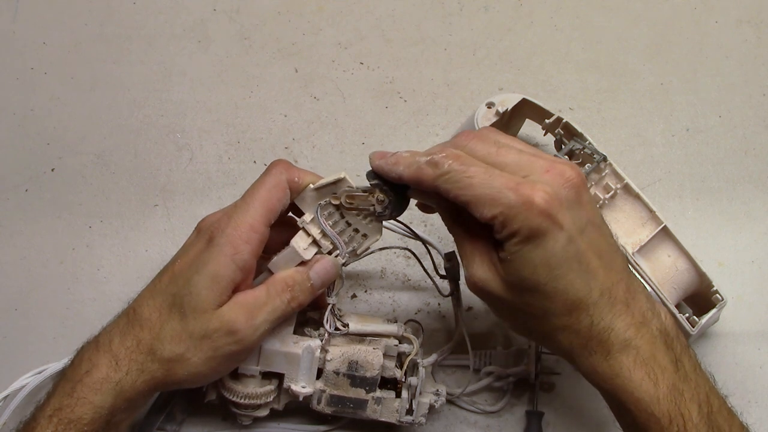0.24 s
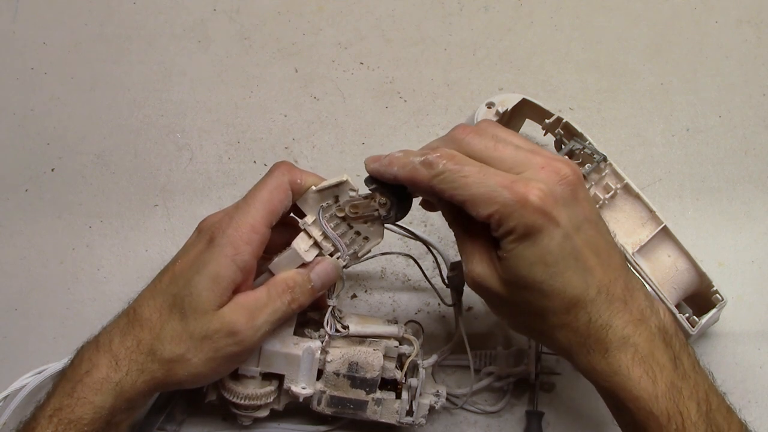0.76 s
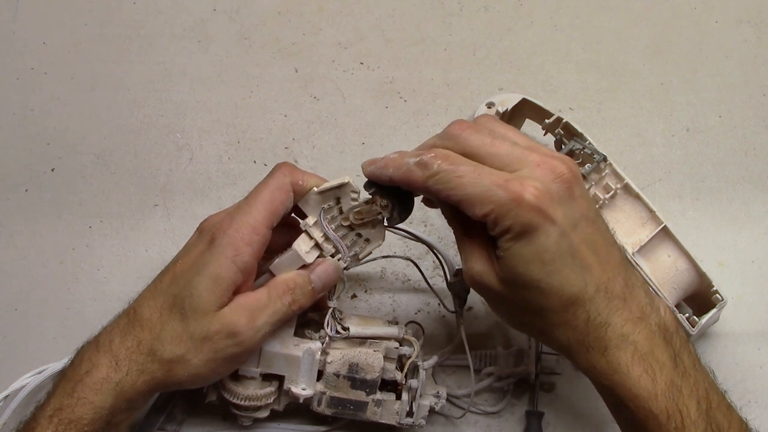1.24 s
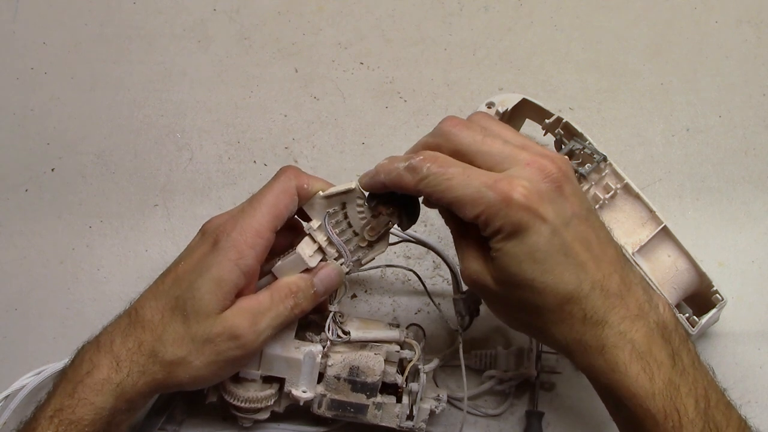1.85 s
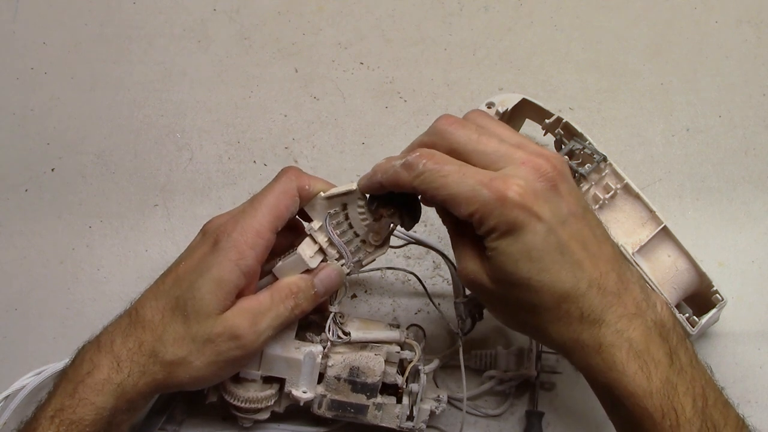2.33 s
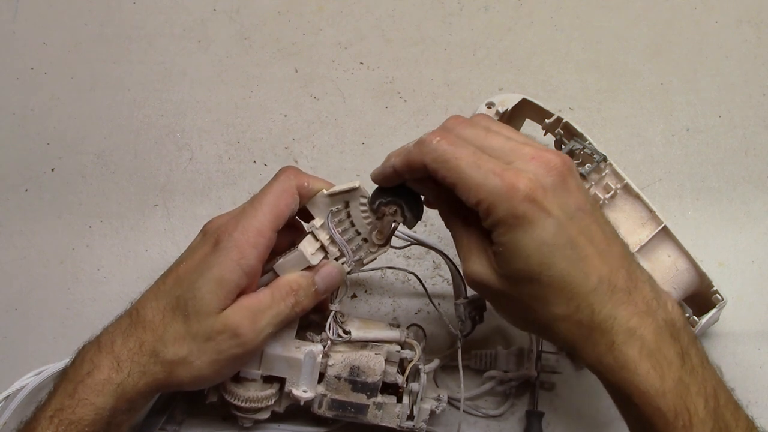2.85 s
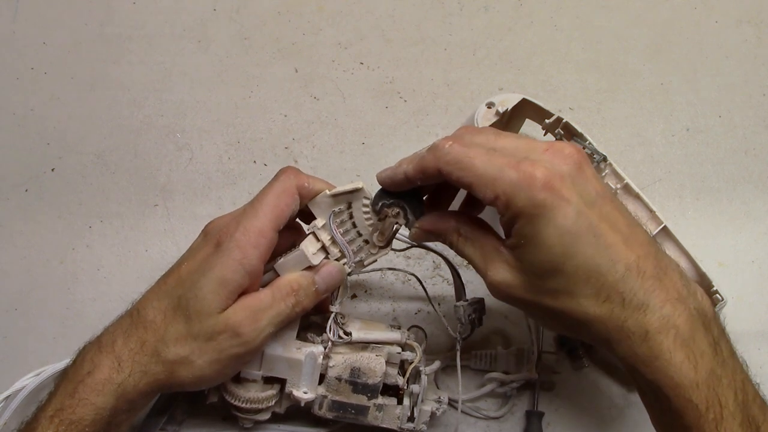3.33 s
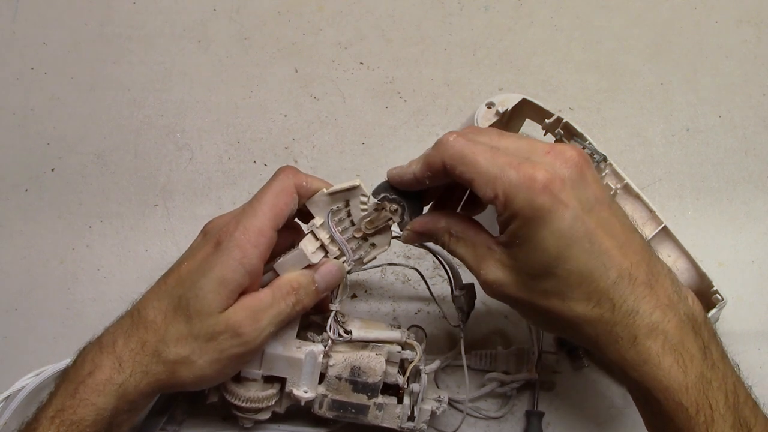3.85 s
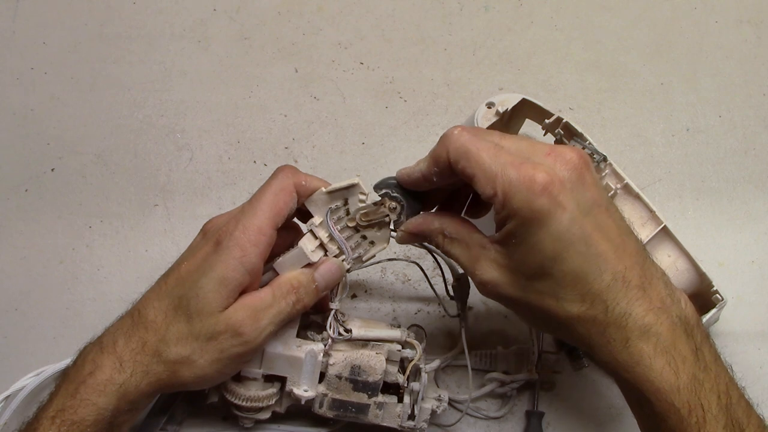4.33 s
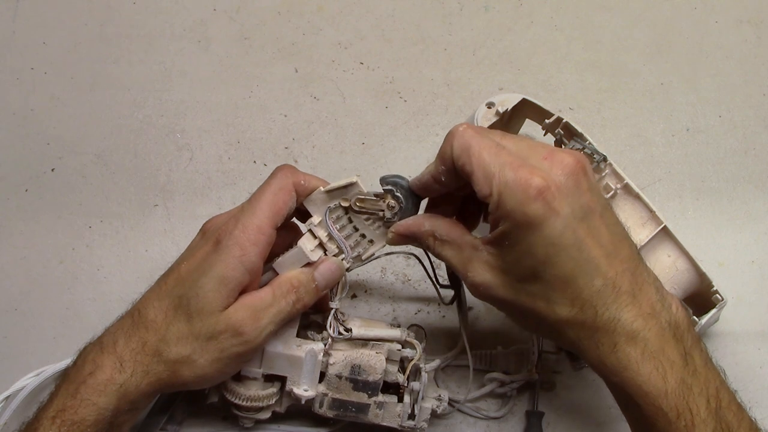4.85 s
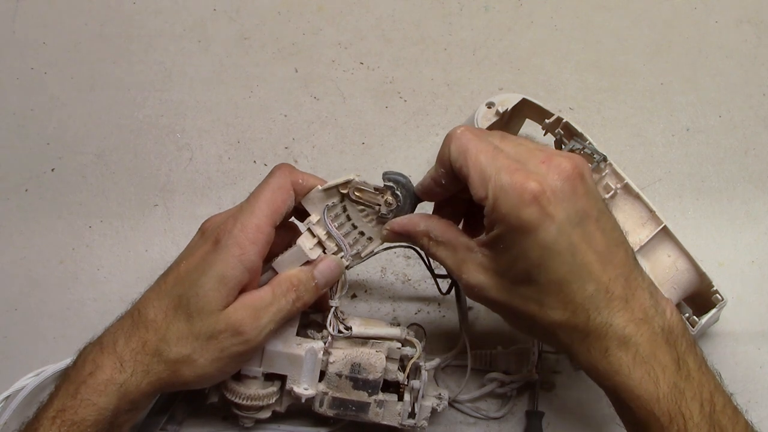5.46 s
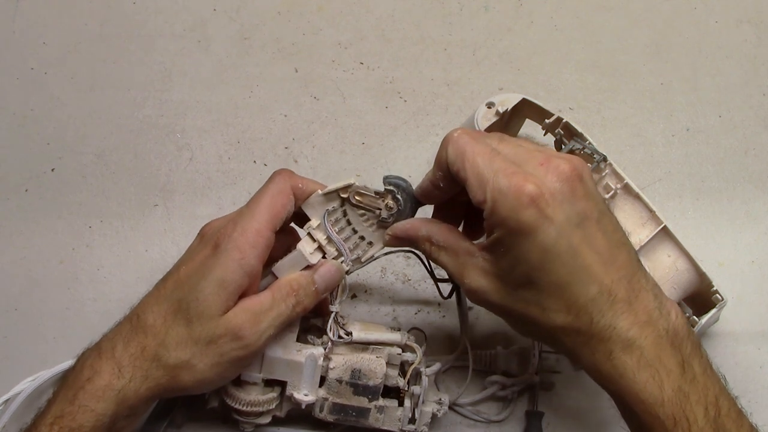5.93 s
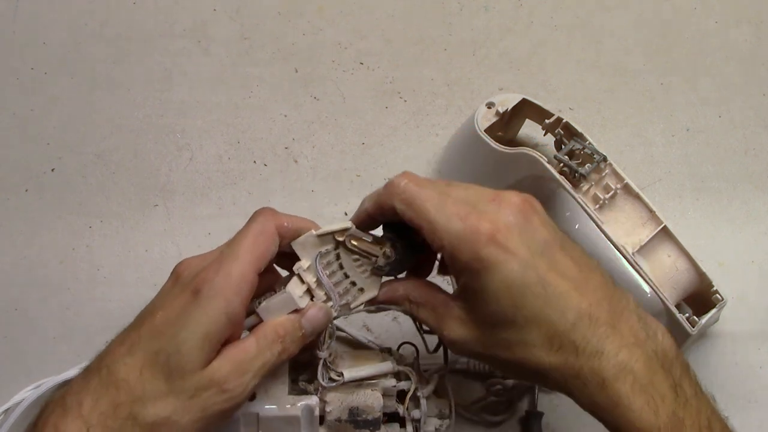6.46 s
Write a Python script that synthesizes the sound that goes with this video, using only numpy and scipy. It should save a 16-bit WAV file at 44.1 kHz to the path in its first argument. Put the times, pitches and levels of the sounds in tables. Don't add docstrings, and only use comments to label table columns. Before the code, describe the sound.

A small plastic rotary switch is turned by hand through crisp, uneven detent clicks, then parts clatter down on a table in a quiet room.

```python
import sys
import numpy as np
from scipy import signal
from scipy.io import wavfile
from scipy.ndimage import uniform_filter1d

SR = 44100
rng = np.random.default_rng(int(sys.argv[2]) if len(sys.argv) > 2 else 0)


def log_audio(samples):
    frames = np.atleast_2d(samples).T
    limited = np.clip(frames, -1, 1)
    pcm = np.round(limited * 32767).astype(np.int16)
    wavfile.write(sys.argv[1], SR, pcm)


def volts_from_decibels(level):
    exponent = np.asarray(level, float) / 20
    return 10 ** exponent


N = 294756


def evened(x):
    return x / np.sqrt(np.mean(x ** 2) + 1e-20)


def read(points, hz):
    f, value = np.transpose(points)
    return np.interp(np.log(hz + 1), np.log(f + 1), value)


def add(mix, s, sound):
    part = mix[max(round(s * SR), 0):][:len(sound)]
    part += sound[:len(part)]


def play(source, rows):
    out = np.zeros(N)
    for row in rows:
        add(out, *source(*row))
    return out


def ring(modes, seconds, favour_hz=None, favour_db=0, spread=0.16, loose=0., scatter=0.):
    hz, db, t60 = np.transpose(modes)[:, :, None]
    shift, phase = rng.standard_normal((len(modes), 2)).T[:, :, None]
    if favour_hz:
        db = db + favour_db * np.exp(-(np.log(hz / favour_hz) / spread) ** 2)
    t = np.arange(round(seconds * SR)) / SR
    wave = np.sin(2 * np.pi * hz * (1 + loose * shift) * t + scatter * phase)
    return (volts_from_decibels(db - 60 * t / t60) * wave).sum(0)


def grit(size, per_s, uneven_db):
    hit, sign, strength = rng.random((size, 3)).T
    height = volts_from_decibels(-uneven_db * np.log(strength + 0.0035))
    return (hit < per_s / SR) * np.sign(sign - .5) * height


# frequency in Hz, level in dB per Hz.
AIR_COLOUR = [(20, -30), (45, -19), (75, -5.5), (120, -6), (230, -3), (420, -3.5), (700, -7.5),
              (1130, -11.5), (1520, -10), (2480, -16), (3340, -18), (6050, -22.5), (11000, -28.5),
              (16000, -38.5)]
# frequency in Hz, likeness (1 = same).
AIR_LIKENESS = [(60, 0.93), (180, 0.9), (550, 0.74), (1650, 0.81), (4970, 0.79), (15000, 0.9)]


def air():
    frames, hz = N // 256 + 5, np.fft.rfftfreq(1024, 1 / SR)
    a, b, c, d, patches = rng.standard_normal((frames, 513, 5)).T
    patches = evened(uniform_filter1d(uniform_filter1d(patches, 10, 0), 16, 1))
    same = np.clip(read(AIR_LIKENESS, hz), -1, 1)[:, None]
    left = a + 1j * b
    right = same * left + np.sqrt(1 - same ** 2) * (c + 1j * d)
    z = np.array([left, right]) * volts_from_decibels(read(AIR_COLOUR, hz)[:, None] + 0.67 * patches)
    noise = signal.istft(z, nperseg=1024, noverlap=768)[1][:, :N]
    return volts_from_decibels(-53.5) * evened(noise)


FAN_MULTIPLES = (1, 2, 3, 4, 7, 10, 13, 16, 23, 26, 35, 37, 50, 52, 93, 101, 122, 126, 135, 140)
FAN_LEVELS = (-79, -70.5, -71.5, -60.5, -62, -67, -71, -71, -75.5, -71.5, -71, -79, -80, -71.5, -81, -78.5,
              -82, -78, -81, -82.5)


def fan():
    turn_hz, mains_hz, mains_db = 58.87, 360., -70
    t, out = np.arange(N) / SR, np.zeros((2, N))
    for hz, db in [*zip(turn_hz * np.array(FAN_MULTIPLES), FAN_LEVELS), (mains_hz, mains_db)]:
        slow = evened(uniform_filter1d(rng.standard_normal(N // 400 + 2), 5))
        waver = 1 + 0.29 * np.interp(np.arange(N) / 400, np.arange(len(slow)), slow)
        start, apart = rng.random(2)
        phase = 2 * np.pi * (hz * t + start) + .5 * (apart - .5) * np.array([[-1], [1]])
        out += volts_from_decibels(db) * np.sqrt(2) * waver * np.sin(phase)
    return out


# frequency in Hz, level in dB, t60 in seconds.
SHELL_RINGS = [(1000, -13, .02), (1400, -15, .015), (2350, -1, .012), (2650, -3, .011), (3100, -2, .013),
               (3450, -4, .01), (3900, -8, .01), (4500, -9, .01), (5200, -12, .008), (6000, -11, .008)]
# frequency in Hz, level in dB, t60 in seconds.
SPRING_RINGS = [(6900, -6, .007), (7600, -2, .01), (8500, -1, .01), (9400, -2, .008), (10400, -2, .008),
                (11500, -6, .006), (13000, -14, .005), (14600, -23, .004)]


def switch_body(hz, treble_db):
    shell = evened(ring(SHELL_RINGS, .03, hz, favour_db=6.0, spread=.3, loose=0.018, scatter=1.98))
    position = evened(ring([(hz, 0, .009)], .03))
    spring = evened(ring(SPRING_RINGS, .03, loose=0.044, scatter=2.07))
    position_db = -11.0 - .7 * treble_db
    both = shell + volts_from_decibels(position_db) * position + volts_from_decibels(treble_db - 1.5) * spring
    both = both * (1 - np.exp(-np.arange(len(both)) / SR / .00006))
    return signal.lfilter(*signal.butter(2, 1800, "highpass", fs=SR), both)


def tick(s, db, hz, treble_db, chatter_s=0.00093):
    t = np.arange(500) / SR
    swell = (1 - np.exp(-t / 0.00034)) * np.exp(-t / max(chatter_s, .0002))
    blow = 0.33 * rng.standard_normal(len(t)) * swell
    blow[22] += 1
    sound = np.convolve(blow, switch_body(hz, treble_db))
    loudest = np.sqrt(uniform_filter1d(sound ** 2, size=44).max())
    return s, volts_from_decibels(db - 6.5) * sound / loudest


# start in seconds, peak in dB, main ring in Hz.
PLAY_TICKS = [(.3042, -42.5, 2700), (0.4139, -33.5, 3600), (.6898, -41.5, 2650), (.7277, -32.5, 3000),
              (2.0832, -35.5, 3070), (2.2283, -31.5, 2350), (2.4638, -46, 2100), (3.744, -39, 2900),
              (4.129, -40, 3100), (3.665, -45, 1700), (3.332, -46, 2000), (3.0, -47, 2100),
              (2.198, -47, 1700), (4.4, -45, 1700), (4.666, -46, 1800), (3.932, -46, 2400),
              (4.7566, -41.5, 3020)]


def knob_play():
    treble_db, chatter_s = -20, .0008
    return play(tick, [(*row, treble_db, chatter_s) for row in PLAY_TICKS])


def rub(s, length, db, hz, width):
    size = round(length * SR)
    r = np.exp(-np.pi * width / SR)
    poles = [1, -2 * r * np.cos(2 * np.pi * hz / SR), r * r]
    sound = signal.lfilter([1, 0, -1], np.convolve(poles, poles), grit(size, 5000, 3.8))
    return s, volts_from_decibels(db) * evened(sound) * signal.windows.tukey(size, .6)


# start in seconds, length in seconds, rms in dB.
CONTACT_SLIDES = [(.385, .03, -52), (0.845, .05, -58), (1.323, 0.044, -53), (1.729, 0.05, -55),
                  (2.714, 0.35, -71), (3.086, 0.018, -60), (3.118, .016, -60), (4.423, 0.076, -64),
                  (6.634, 0.046, -52), (6.14, .08, -55)]


def contact_slides():
    centre_hz, width_hz = 8000, 3200
    return play(rub, [(*row, centre_hz, width_hz) for row in CONTACT_SLIDES])


# start in seconds, peak in dB, main ring in Hz, treble in dB,
# scrape level in dB relative to the snap.
DETENT_SNAPS = [(0.405, -18, 3120, -1, -21), (0.8876, -31.5, 3380, -4, -10.5),
                (1.3528, -28, 3170, -7.5, -15), (1.7601, -23, 3150, -5, -21), (2.3294, -43, 2420, -5, -10),
                (3.1208, -51, 2340, -2, -16), (3.4306, -33, 3170, -14, -20), (3.7272, -28, 2640, -2.5, -24),
                (4.1142, -28.5, 2580, -4.5, -24), (4.49, -35.5, 3130, -11.5, -13),
                (4.8428, -18, 2550, -9, -23), (5.1693, -19.5, 2540, -14, -20)]


def scrape(s, db, hz, treble_db, length, below_db):
    t = np.arange(-3528, 1764) / SR
    length = max(length, .003)
    push = np.where(t < 0, np.exp(t / length * 2), 0.64 * np.exp(-t / 0.0041))
    ground = signal.fftconvolve(grit(len(t), 3500, 1.8), switch_body(hz, treble_db + 1.5))
    return s + t[0], volts_from_decibels(db + below_db) * push * evened(ground[:len(t)])


def detents():
    out = np.zeros(N)
    for s, db, hz, treble_db, below_db in DETENT_SNAPS:
        climb_s = .016 - .0005 * (db + 20)
        add(out, *tick(s, db, hz, treble_db))
        add(out, *scrape(s, db, hz, treble_db, climb_s, below_db))
    return out


# start in seconds, peak in dB.
SPRING_CATCHES = [(.391, -35), (0.7955, -49), (0.8635, -46), (1.339, -32.5), (1.73, -48), (1.7474, -44),
                  (3.3962, -42), (3.4146, -35), (3.7115, -40), (4.0971, -41.5), (4.3924, -47),
                  (4.4498, -43), (4.4732, -43), (4.8194, -46), (4.85, -40), (5.126, -42), (5.1394, -42),
                  (5.1644, -41)]


def spring_catches():
    hz, treble_db, chatter_s = 2500, -9, .0025
    return play(tick, [(*row, hz, treble_db, chatter_s) for row in SPRING_CATCHES])


# start in seconds, length in seconds, rms in dB, centre in Hz.
HOUSING_CREAKS = [(1.3702, 0.012, -39, 1600), (3.203, 0.14, -51, 280), (3.783, 0.022, -54, 1400),
                  (.398, .03, -51, 900), (4.849, 0.043, -52.5, 1480), (5.183, .08, -54.5, 1000),
                  (5.942, 0.055, -36.5, 540), (5.942, .035, -41.5, 1400)]


def housing_creaks():
    return play(rub, [(*row, .6 * row[-1]) for row in HOUSING_CREAKS])


# start in seconds, peak in dB.
CLIP_TAPS = [(0.5444, -41.5), (3.7853, -41), (5.1824, -31), (5.1964, -35), (5.2114, -36), (5.226, -39),
             (5.239, -40), (5.9209, -41), (6.0447, -39)]


def clip_taps():
    hz, treble_db, chatter_s = 3800, -28, .003
    return play(tick, [(*row, hz, treble_db, chatter_s) for row in CLIP_TAPS])


# frequency in Hz, level in dB, t60 in seconds.
TABLE_RINGS = [(80.7, -17.5, 0.55), (160, -12.5, 0.19), (221, -10.5, 0.13), (290, -4.5, 0.22),
               (345.1, 2.5, 0.098), (430, -3, 0.087), (487, -15.5, 0.13), (567.6, -9, 0.14),
               (720, -18.5, 0.19)]
# frequency in Hz, level in dB, t60 in seconds.
HOUSING_RINGS = [(760, -13, .07), (870, -11, .07), (1000, -6, .08), (1141, -1, .11), (1281, -5, .07),
                 (1525, -3, .05), (1760, -8, .045), (1900, -9, .045), (2200, -9, .03), (2610, -6, .03),
                 (2770, -7, .03), (2955, -3, .022), (3250, -7, .022), (3520, -4, .035), (3880, -4, .03),
                 (4140, -7, .028), (4500, -8, .02), (4835, -6, .032), (5200, -10, .02), (5960, -11, .018),
                 (6900, -11, .015), (8000, -9, .012), (9500, -14, .01), (11500, -18, .008),
                 (14000, -25, .006)]


def knock(s, db, hz, housing_db, edge):
    t = np.arange(4400) / SR
    contact = max(.3 / hz * (1 - .025 * db), .0003)
    push = t / contact * np.exp(-t / contact * 3)
    wood = signal.fftconvolve(push, ring(TABLE_RINGS * np.array([1, 1, .8]), .3, hz, favour_db=7.5))
    wood = np.diff(wood, prepend=0)

    dull = signal.butter(2, min(1000 * 2 ** edge, 15000), fs=SR)
    rattle = grit(len(t), 5000, 1.96) * (.5 * np.exp(-t / 0.0052) + .13 * np.exp(-t / 0.024))
    rattle[8] += 1
    rattle = signal.lfilter(*dull, rattle)
    held = np.array([1, 1, .5])
    plastic = signal.fftconvolve(rattle, ring(HOUSING_RINGS * held, .3, loose=0.02, scatter=1.5))

    crack = rng.standard_normal(len(plastic))
    crack = signal.lfilter(*signal.butter(2, [900, 5200], "bandpass", fs=SR), crack)
    crack = signal.lfilter(*dull, crack) * np.exp(-np.arange(len(plastic)) / SR / .011)
    shell = plastic / abs(plastic).max() + volts_from_decibels(-7) * crack / abs(crack).max() * 2
    return s, volts_from_decibels(db) * (wood / abs(wood).max() + volts_from_decibels(housing_db) * shell)


# start in seconds, peak in dB, favoured table ring in Hz, housing in dB.
HOUSING_ROCKS = [(1.3716, -29, 344, -10), (1.3795, -31, 290, -12), (1.392, -30.5, 335, -12),
                 (1.428, -40, 160, -17), (1.792, -37.5, 334, -14), (1.802, -41.5, 300, -14),
                 (2.146, -45, 166, -18), (2.361, -36.5, 267, -13), (3.239, -43, 246, -13),
                 (3.262, -37.5, 263, -13), (3.288, -40.5, 304, -14), (3.786, -52, 240, 9)]


def housing_rocks():
    edge = .35
    return play(knock, [(*row, edge) for row in HOUSING_ROCKS])


# start in seconds, peak in dB, ring in Hz, treble in dB, chatter in seconds.
SPRING_PING = (1.695, -43, 3060, 9, .0018)


def spring_ping():
    return play(tick, [SPRING_PING])


# start in seconds, length in seconds, rms in dB.
BROAD_RUBS = [(2.3, 0.055, -59), (2.82, .04, -61), (3.398, 0.034, -53.5), (3.723, 0.023, -47.5),
              (4.113, 0.02, -49.5), (5.5, 0.37, -63), (5.885, 0.26, -56.5), (6.138, 0.085, -51.5),
              (6.24, .44, -58), (6.39, 0.065, -50.5), (6.597, 0.024, -51)]


def broad_rubs():
    centre_hz, width_hz = 3800, 7500
    return play(rub, [(*row, centre_hz, width_hz) for row in BROAD_RUBS])


# start in seconds, length in seconds, rms in dB, centre in Hz.
WIRE_SQUEAKS = [(5.173, 0.076, -53, 3780), (5.888, 0.25, -59, 3700), (6.145, 0.055, -54, 4950),
                (6.635, 0.05, -54, 2700), (6.635, .05, -56, 4900)]


def wire_squeaks():
    return play(rub, [(*row, .1 * row[-1]) for row in WIRE_SQUEAKS])


# time in seconds, table rumble in dB, housing rasp in dB.
DRAG_LEVELS = [(5.4, -68, -59), (5.502, -52, -54), (5.612, -50.5, -50), (5.94, -47.5, -57),
               (6.04, -44.5, -57), (6.14, -41.5, -45.5), (6.28, -37, -44), (6.472, -48, -52),
               (6.68, -44, -49.5)]


def drag():
    s, *levels = np.transpose(DRAG_LEVELS)
    t = np.arange(s[0], s[-1], 1 / SR)
    bodies = np.diff(ring(TABLE_RINGS, 0.028)), ring(HOUSING_RINGS[:8], 0.0052)
    out = np.zeros(len(t))
    for db, body, per_s in zip(levels, bodies, (500, 2500)):
        body = (body - body.mean()) * np.hanning(len(body))
        sound = signal.fftconvolve(grit(len(t), per_s, 1.1), body)[:len(t)]
        out += volts_from_decibels(np.interp(t, s, db) - 4.5) * evened(sound)
    return s[0], out * signal.windows.tukey(len(t), .02)


# start in seconds, peak in dB, favoured table ring in Hz, housing in dB,
# rattle edge in octaves above 1 kHz.
PART_DROPS = [(5.865, -43, 342, -15, .4), (5.94, -38, 400, -4, .8), (5.948, -28, 430, -4, 1.9),
              (5.964, -32, 390, -6, 1.6), (5.99, -33.5, 500, -5, 1.4), (6.02, -34.5, 245, -8, 1.2),
              (6.102, -30.5, 317, -16, 1.2), (6.121, -38, 330, -10, .6), (6.211, -6, 362, -4.5, 3.6),
              (6.2165, -12, 400, -9, 2.4), (6.226, -9.5, 270, -15, 1.5), (6.239, -13.5, 320, -14, 2),
              (6.253, -17, 150, -17, 1.4), (6.262, -25, 82, -14, 1.2), (6.286, -27, 300, -14, 0.97),
              (6.352, -29, 330, -13, 0.71), (6.369, -25.5, 288, -12, 1.1), (6.517, -31, 353, -15, 0.43),
              (6.552, -35.5, 285, -5.5, 0.55), (6.607, -22.5, 280, -11, 2.4), (6.625, -17, 362, -22, .8),
              (6.652, -24.5, 406, -14, 0.58)]


def part_drops():
    return play(knock, PART_DROPS)


def switch():
    ticks = knob_play() + detents() + spring_catches() + clip_taps() + spring_ping()
    rubs = contact_slides() + housing_creaks() + broad_rubs() + wire_squeaks()
    return ticks + rubs


def table():
    out = housing_rocks() + part_drops()
    add(out, *drag())
    return signal.sosfilt(signal.butter(2, 75, "highpass", fs=SR, output="sos"), out)


# frequency in Hz, t60 in seconds.
ROOM_DECAY = [(100, 0.14), (500, 0.12), (2000, 0.17), (6000, 0.12), (14000, 0.14)]


def room(x):
    taps = np.zeros((2, SR // 2))
    at = np.arange(90, SR // 2 - 20, 8)
    at = at + rng.integers(0, 8, (2, len(at)))
    np.put_along_axis(taps, at, rng.choice([-1., 1.], at.shape), 1)
    hz, t, z = signal.stft(taps, SR, nperseg=256)
    decay = volts_from_decibels(-60 * t / read(ROOM_DECAY, hz)[:, None])
    mid, side = signal.istft(z * decay, SR, nperseg=256)[1]
    spread = 0.13
    tail = np.array([mid + spread * side, mid - spread * side]) / np.linalg.norm(mid)
    return signal.fftconvolve(x[None], tail, axes=1)[:, :N]


def scene():
    clicks, bumps = switch(), table()
    near = clicks + bumps
    glance = volts_from_decibels(-25.0) * np.roll(near - np.roll(near, shift=3), 40) * np.array([[1], [-1]])
    wet = room(volts_from_decibels(-11.5) * clicks + volts_from_decibels(-13.0) * bumps)
    return near * volts_from_decibels(np.array([[.2], [-.2]])) + glance + wet + air() + fan()


def roll_off(x):
    return signal.sosfilt(signal.butter(12, 16500, fs=SR, output="sos"), x)


def record(dry):
    band = signal.sosfilt(signal.butter(2, 45, "highpass", fs=SR, output="sos"), dry)
    band = signal.oaconvolve(band, signal.firwin(255, 16100, fs=SR)[None], "same")
    return roll_off(band)


dry = scene()
out = record(dry)
log_audio(out)
```